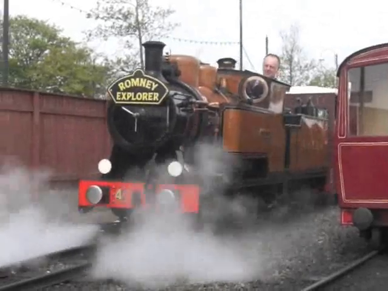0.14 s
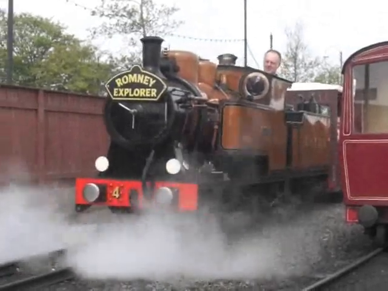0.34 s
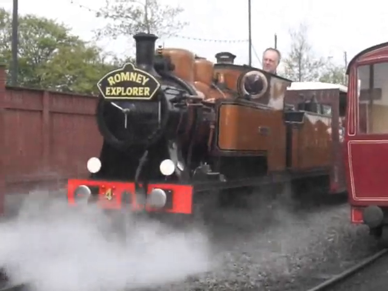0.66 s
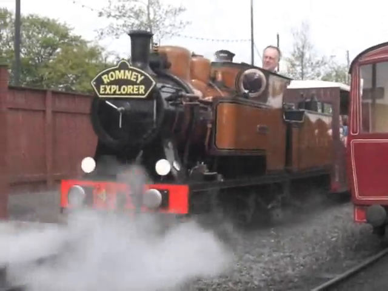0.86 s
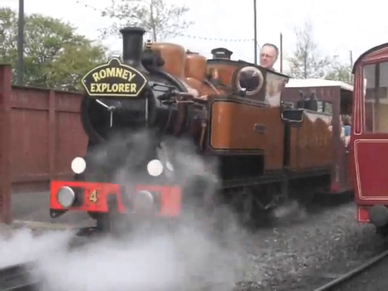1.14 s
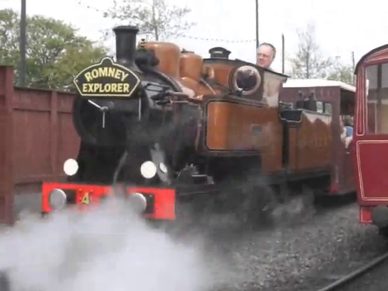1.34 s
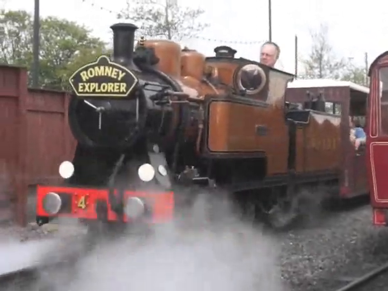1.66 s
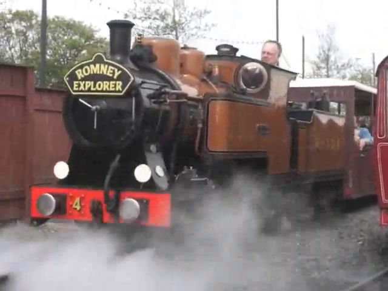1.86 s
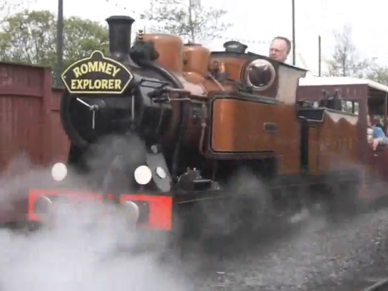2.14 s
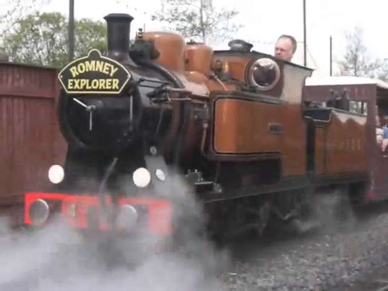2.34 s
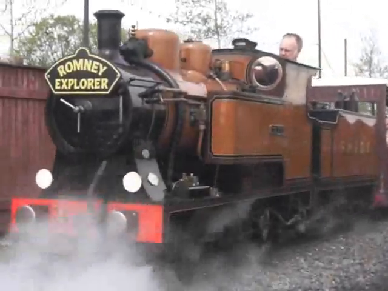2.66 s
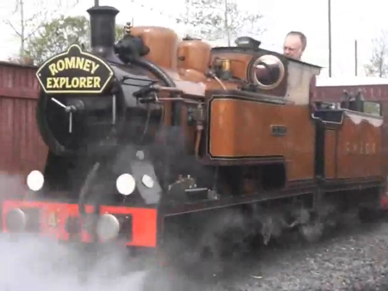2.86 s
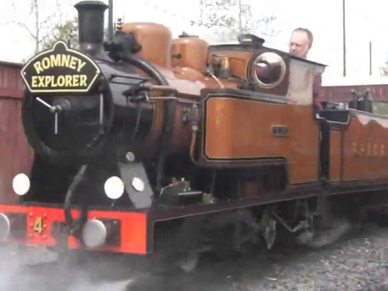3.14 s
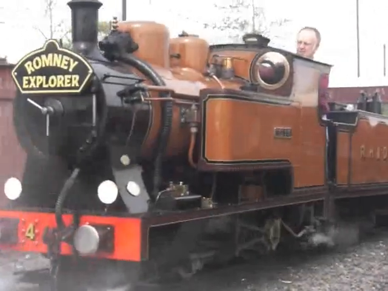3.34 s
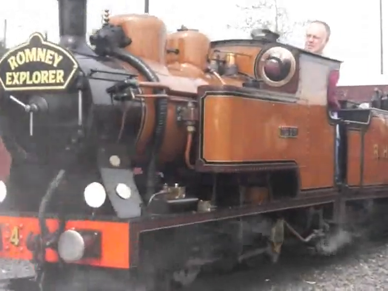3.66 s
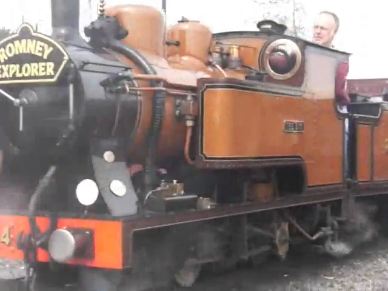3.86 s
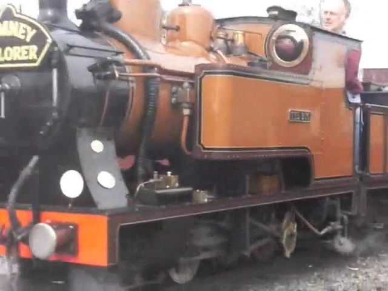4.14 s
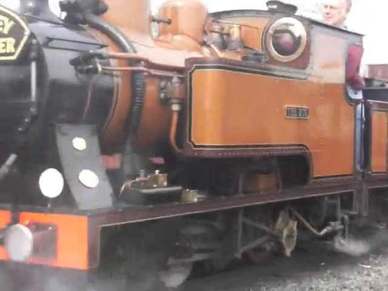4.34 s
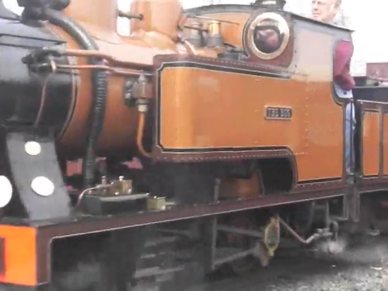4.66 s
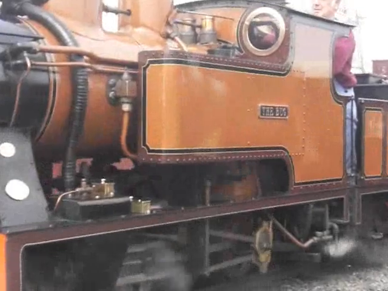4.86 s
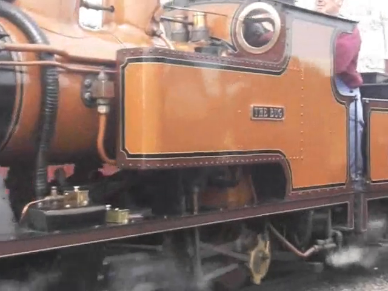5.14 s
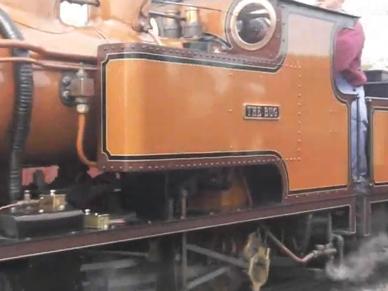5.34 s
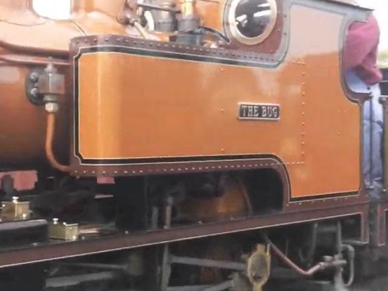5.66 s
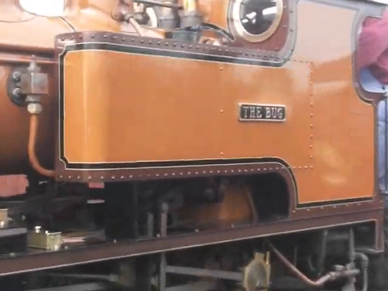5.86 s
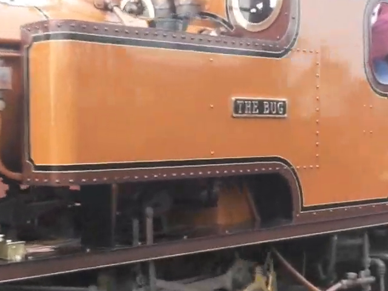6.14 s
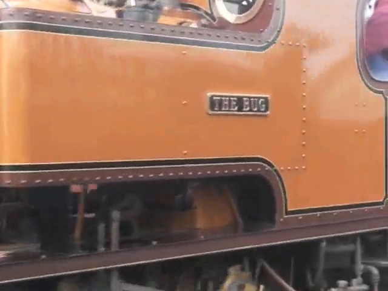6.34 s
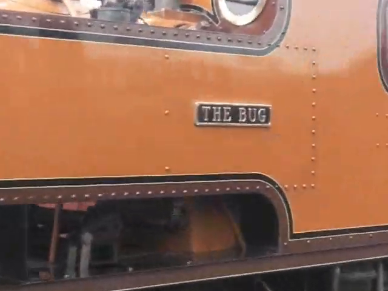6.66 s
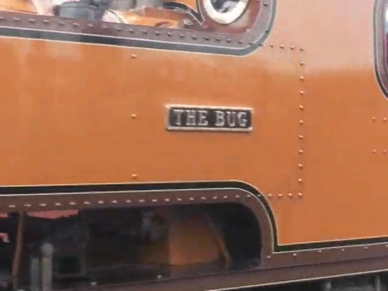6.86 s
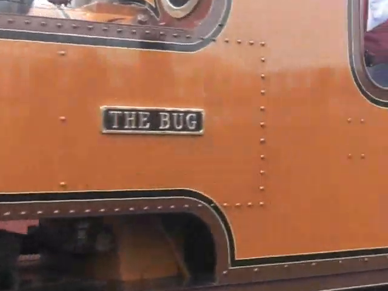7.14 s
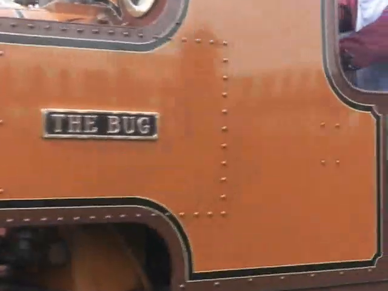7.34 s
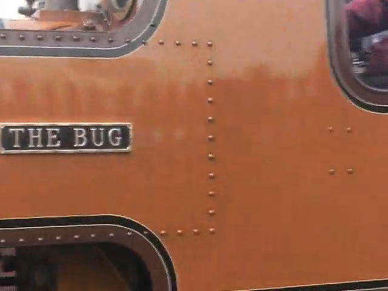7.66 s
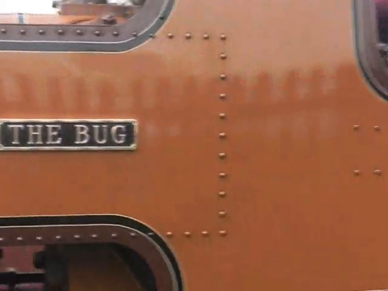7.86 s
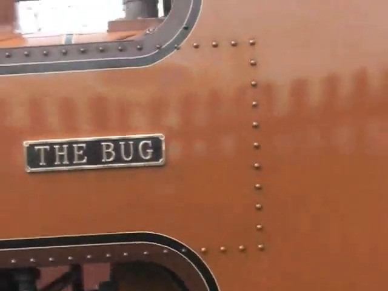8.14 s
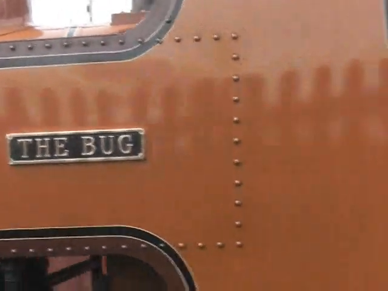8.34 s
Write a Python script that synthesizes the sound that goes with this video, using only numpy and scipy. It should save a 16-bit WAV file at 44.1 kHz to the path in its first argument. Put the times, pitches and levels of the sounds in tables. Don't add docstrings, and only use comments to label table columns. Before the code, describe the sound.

Outdoors beside a fenced track, a small steam engine approaches slowly. Bright, ragged jets of steam hiss and surge, some with a lower roar and a brief slap off the fence. Soft hollow chimney puffs begin after a few seconds; the big jets then die away, leaving regular hissing strokes and chuffs that strengthen as the engine comes very near the microphone. Low rolling rumble and faint motor hum lie underneath.

```python
import sys
import numpy as np
from scipy import signal
from scipy.fft import rfft, irfft
from scipy.io import wavfile
from scipy.ndimage import uniform_filter1d

SR = 44100
rng = np.random.default_rng(int(sys.argv[2]) if len(sys.argv) > 2 else 0)


def gain_from_decibels(decibels):
    exponent = np.asarray(decibels, float) / 20
    return 10 ** exponent


def inscribe(sig):
    pcm = np.round(np.clip(np.atleast_2d(sig).T, -1, 1) * 32767)
    wavfile.write(sys.argv[1], SR, pcm.astype(np.int16))


N = 375275
HOP = 128
TIMES = np.arange(N // HOP + 5) * HOP / SR

# (start [s], length [s], jet level [dB], fizz re jet [dB], change over the blast [dB])
STROKES = [
    (5.35, 0.24, -25, 1.5, 0),
    (5.633, 0.12, -21, 2, -2),
    (5.86, 0.14, -22.5, -9, 7),
    (6.04, 0.2, -22.5, 0.5, -3),
    (6.443, 0.23, -22, -1.5, -1),
    (6.89, 0.24, -20, -3.5, 2.5),
    (7.377, 0.22, -18.5, -2.5, -2.5),
    (7.835, 0.25, -18, -4, -3),
    (8.234, 0.2, -16.5, -5.5, -3.5),
]
# (time [s], nearness of the ear to the jet axis [0-1], treble loss in vapour [dB])
AIM = [(0, 0, 5), (.3, 0, 5), (.55, 0.39, -3), (.9, 0, 2), (1.2, 0.45, 0), (1.6, 0.3, -3), (2.1, 0.6, 0),
       (2.5, 0.23, 0), (3.1, 0.35, 0.5), (3.45, 0.62, 7), (3.85, 0.84, 1), (4.35, .9, 1), (4.6, 0.6, 4),
       (5.2, 0.55, 2), (6.1, 0.63, -2.5), (6.5, 0.25, -1), (7.2, 0.23, 3), (8.51, .05, 2)]
STROKE_EDGES_S = (0.061, 0.096)


def evened(x):
    return x / np.sqrt(np.mean(abs(x) ** 2) + 1e-20)


def read(points, hz):
    f, value = np.transpose(points)
    return np.interp(np.log(hz + 1), np.log(f + 1), value)


def follow(rows, t):
    s, *columns = np.transpose(rows)
    return [np.interp(t, s, c) for c in columns]


def smooth(frames):
    return np.interp(np.arange(N) / SR, TIMES, frames)


def drift(per_s):
    rates = np.geomspace(per_s / 6, per_s, 20)
    turns = rates * TIMES[:, None] + rng.random(len(rates))
    return evened(np.sin(2 * np.pi * turns).sum(1))


def resonate(x, hz, width):
    turn = np.exp(2j * np.pi * np.cumsum(hz * np.ones(len(x))) / SR)
    r = np.exp(-np.pi * width / SR)
    return 2 * (turn * signal.lfilter([1 - r], [1, -r], x / turn)).real


def coloured(colour):
    gain = gain_from_decibels(read(colour, np.fft.rfftfreq(N, 1 / SR)))
    return evened(irfft(rfft(rng.standard_normal(N)) * gain, N))


def blast(start, length, edges, change_db):
    rise_s, fall_s = edges
    rise = np.clip(.5 + (TIMES - start) / rise_s / 2, 0, 1)
    fall = np.clip(.5 + (start + length - TIMES) / fall_s / 2, 0, 1)
    along = np.clip((TIMES - start) / length, 0, 1) - .5
    swell = np.sin(rise * np.pi / 2) * np.sin(fall * np.pi / 2) * gain_from_decibels(change_db * along)
    return swell ** 2, along


def hum(waver_hz=1.2, half_db=-6.0):
    # (time [s], frequency [Hz], level [dB])
    motor = [(0, 132.5, -49), (1.2, 132.5, -47), (1.6, 132, -52), (2.7, 130, -49), (3.4, 127.5, -51),
             (3.9, 127, -39), (4.3, 127, -44), (4.6, 126.5, -53), (5.5, 126, -48.5), (6.8, 125.5, -51),
             (8.51, 124, -50)]
    t = np.arange(N) / SR
    hz, db = follow(motor, t)
    turns = np.cumsum(hz + waver_hz * smooth(drift(per_s=5.3))) / SR
    swell = gain_from_decibels(db - 3.5 + 2.0 * smooth(drift(per_s=6.5)))
    return swell * (np.sin(2 * np.pi * turns) + gain_from_decibels(half_db) * np.sin(np.pi * turns))


def rumble(jolt_s=0.031):
    # (time [s], level [dB])
    rolling = [(0, -51), (1.4, -48.5), (1.7, -46), (3.25, -49.5), (3.6, -45), (4.1, -44), (4.36, -50),
               (4.7, -51), (5.15, -45), (5.6, -52), (6.25, -50), (7, -48), (8.51, -44)]
    # (frequency [Hz], density [dB per Hz])
    low_colour = [(8.8, -34), (15, -2.5), (48, 1), (200, -7.5), (260, -34), (440, -120)]
    # (time [s], level [dB])
    jolts = [(.14, -46), (2.7, -41), (3.48, -42), (3.95, -39), (4.19, -35), (4.59, -42), (4.74, -45),
             (5.87, -53), (6.14, -54), (6.89, -35), (7.54, -45), (7.73, -42), (7.95, -39), (8.2, -38),
             (8.37, -44)]
    power = gain_from_decibels(follow(rolling, TIMES)[0] + 1.6 * drift(per_s=9.2)) ** 2
    for s, db in jolts:
        power = power + gain_from_decibels(db) ** 2 * np.exp(-((TIMES - s) / jolt_s) ** 2)
    return coloured(low_colour) * smooth(np.sqrt(power)) * gain_from_decibels(-0.5)


def chimney(rise_s=.008, fall_s=.016, lead_s=.015, thump_s=.024, sing=.06):
    # (time [s], puff [dB], thump [dB], pipe note [Hz], side modes re main [dB])
    chuffs = [(3.12, -39, -52, 573, -6), (3.426, -36, -37, 559, -6), (3.73, -48, -41, 559, 0),
              (3.994, -37, -27, 545, 0), (4.276, -42, -40, 561, 0), (4.631, -33, -37, 553, 2),
              (4.865, -31.5, -48, 530, 0), (5.113, -43, -37, 570, 0), (5.419, -37, -46, 496, 2),
              (5.677, -34, -34, 536, 2), (5.905, -36, -32, 532, 2), (6.148, -35, -46, 539, -3),
              (6.395, -30.5, -54, 532, 3), (6.626, -34, -37, 548, -5), (6.851, -31.5, -28, 542, 4),
              (7.076, -39, -37, 530, 4), (7.313, -28, -34, 553, 15), (7.541, -29, -41, 566, 0),
              (7.739, -31, -40, 557, 4), (7.975, -26, -26, 538, -1.5), (8.184, -25, -43, 533, -2),
              (8.392, -25.5, -30, 535, 0)]
    # (multiple of the note [1], bandwidth [Hz], level [dB])
    modes = [
        (1.01, 55, 0),
        (.85, 55, -4),
        (1.2, 90, -6),
        (1.45, 180, -11),
        (1.95, 300, -15),
        (.6, 150, -12),
    ]
    out = np.zeros(N + SR)
    t = np.arange(-SR // 10, SR // 10) / SR
    for s, puff_db, thump_db, note_hz, breathy_db in chuffs:
        puff_air, push_air = rng.standard_normal((2, len(t)))
        gust = np.exp(-(abs(t) / np.where(t < 0, rise_s, fall_s)) ** 1.6)
        blow = (puff_air + sing * np.sin(2 * np.pi * note_hz * t)) * gust
        puff = np.zeros(len(t))
        for i, (k, width, db) in enumerate(modes):
            ring = resonate(resonate(blow, k * note_hz, width), k * note_hz, 2 * width)
            puff += (-1) ** i * gain_from_decibels(db + breathy_db * (i > 0)) * evened(ring)
        crest = np.argmax(uniform_filter1d(puff ** 2, size=500))
        puff = np.roll(puff, len(t) // 2 - crest)
        push = resonate(push_air, 50., 45.) * np.exp(-((t + lead_s) / thump_s) ** 2)
        at = round(s * SR) - SR // 10
        out[at:at + len(t)] += gain_from_decibels(puff_db + 6.5) * puff / abs(puff).max()
        out[at:at + len(t)] += gain_from_decibels(thump_db) * push / abs(push).max()
    return out[:N]


def roar():
    # (start [s], length [s], roar [dB], deep part re roar [dB], change over the blast [dB])
    cocks = [(1.07, 0.074, -36.5, -5, 9), (1.2, 0.25, -41.5, -17, -1), (1.5, 0.53, -32, -4, 2.5),
             (2.08, 0.22, -30.5, -6, 0), (2.35, 0.51, -31.5, -5.5, -2.5), (2.93, 0.13, -39.5, -5.5, -5),
             (3.5, 0.35, -51, 1, 17), (3.8, 0.15, -39.5, -7, 10), (4.02, 0.31, -41.5, -5.5, -3),
             (4.4, 0.33, -29.5, -6.5, 3.5), (4.78, 0.13, -39, -10, -6), (4.93, 0.33, -33, -6.5, 4.5)]
    # (frequency [Hz], density [dB per Hz])
    broad_colour = [(250, -40), (450, -7), (650, 0.5), (1000, 1), (1500, 3), (2200, 1), (3200, -3),
                    (5000, -27)]
    low_colour = [(35, -24), (90, -6), (250, 0), (400, 0), (600, -2), (900, -22)]
    cock_edges_s = (0.052, 0.059)
    floor_db, stroke_db, stroke_deep_db, gurgle_db = -43.5, -21.5, -9.5, 0.33
    deep_far_db, deep_near_db, nearing_s = -49.5, -42.5, (6.9, 7.4)
    broad = gain_from_decibels(floor_db) ** 2
    deep = gain_from_decibels(np.interp(TIMES, nearing_s, [deep_far_db, deep_near_db])) ** 2
    strokes = [(s, length, db + stroke_db, stroke_deep_db, change_db)
               for s, length, db, _, change_db in STROKES]
    for rows, edges in (cocks, cock_edges_s), (strokes, STROKE_EDGES_S):
        for start, length, db, deep_db, change_db in rows:
            power = blast(start, length, edges, change_db)[0] * gain_from_decibels(db) ** 2
            broad = broad + power
            deep = deep + power * gain_from_decibels(deep_db) ** 2
    gurgle = gain_from_decibels(gurgle_db * drift(per_s=8.5))
    broad_part = coloured(broad_colour) * smooth(np.sqrt(broad) * gurgle) * gain_from_decibels(3.0)
    deep_part = coloured(low_colour) * smooth(np.sqrt(deep) * gurgle) * gain_from_decibels(1.5)
    return broad_part + deep_part


def steam():
    # (start [s], length [s], jet level [dB], fizz re jet [dB], change over the blast [dB])
    blasts = [(-.05, .46, -20, -2, -3.5), (.09, 0.27, -21.5, -9, 6), (0.45, 0.092, -19, -8, 0),
              (0.58, 0.16, -18.5, -6.5, -3.5), (0.81, 0.21, -20, -4, 5), (1.051, 0.21, -15.5, -3, -1),
              (1.276, 0.17, -18.5, -3.5, -5), (1.471, 0.58, -15, -3.5, 2), (1.594, 0.15, -16, -6, -3),
              (2.077, .4, -15, -2.5, 2.5), (2.498, 0.42, -13.5, -5, -3), (2.948, 0.19, -17, -3, -7),
              (3.074, 0.28, -22.5, -2.5, 0), (3.462, 0.064, -20.5, 2.5, 4.5), (3.66, 0.21, -24, -11, 10),
              (3.9, .16, -18, -5, -5), (4.09, 0.086, -18.5, -4, 2), (4.248, 0.22, -17.5, 0, 6),
              (4.456, 0.34, -17, 1.5, 0), (4.56, 0.11, -18, 0, -4), (4.78, 0.15, -23, 5.5, 0),
              (4.92, 0.4, -16.5, 0.5, -1), (6.27, 0.14, -31, -1, -7)]
    # (skirt [dB], lower hiss [dB], core [dB], fizz [dB])
    leak_db = [-38, -32.5, -23.5, -28]
    # (skirt [dB], lower hiss [dB], core [dB], fizz [dB])
    axis_db = [9, 7.5, -1.5, 0]
    blast_edges_s = (0.058, 0.065)
    skirt_db, lower_db = -17, -10.5
    blast_brighten_db, stroke_brighten_db = -1.5, 8
    fizz_steepness = 1.35
    steepness = np.array([[1], [1], [1], [fizz_steepness]])
    power = gain_from_decibels(leak_db)[:, None] ** 2 * np.ones(len(TIMES))
    kinds = (blasts, blast_edges_s, blast_brighten_db), (STROKES, STROKE_EDGES_S, stroke_brighten_db)
    for rows, edges, brighten_db in kinds:
        for start, length, db, fizz_db, change_db in rows:
            shape, along = blast(start, length, edges, change_db)
            zones_db = np.array([skirt_db, lower_db, 0, fizz_db])[:, None]
            zones_db = zones_db + np.outer([0.5, 0.54, 0.26, 1], brighten_db * along)
            power = power + shape ** steepness * gain_from_decibels(db + zones_db) ** 2
    return 10 * np.log10(power) + np.outer(axis_db, follow(AIM, TIMES)[0])


def bounced(hz, wander=0.009, veil_db=2.5):
    # (facing the jet at [s], for [s], extra path [ms], path growth [ms per s],
    # share of the direct jet [1])
    bounces = [(4, 3.5, .18, .004, .11), (0, .35, .21, .1, .14), (6.5, 2.2, .33, .002, .075),
               (4.8, .8, .58, -.02, .08), (8, .7, .46, -.04, .06), (5.1, .2, .19, -.02, .1),
               (6.12, .2, .162, -.03, .1), (7.08, .15, .19, -.05, .13), (8.33, .12, .15, -.1, .1),
               (.45, .15, 1.2, -.1, .16), (.35, .3, 1.47, .1, .15), (.95, .3, 1.4, -.15, .17),
               (.55, .2, 1.6, -.3, .14), (1.6, .25, 1.62, -.1, .16), (2.1, .2, 1.36, .1, .18),
               (2.4, .2, 1.6, .2, .16), (2.8, .22, 1.52, .2, .18), (2.8, .2, 1.66, .2, .13),
               (3.15, .2, 1.78, .2, .2), (3.25, .2, 2.22, .1, .14), (3.5, .15, 1.72, .1, .14),
               (1.7, .4, 1.95, .1, .1), (3.95, .25, 2.26, .1, .18), (3.9, .3, 1.98, .2, .14)]
    comb = np.ones((len(hz), len(TIMES)), complex)
    power = 1
    for s, span, path_ms, growth, facing in bounces:
        ms = path_ms + growth * (TIMES - s)
        share = facing * np.exp(-((TIMES - s) / span) ** 2)
        share = share * gain_from_decibels(3.5 + veil_db * drift(per_s=6.0))
        near = share > .003
        ms = ms * (1 + wander * drift(per_s=3.0))
        comb[:, near] += share[near] * np.exp(-2j * np.pi * hz[:, None] * ms[near] / 1000)
        power = power + share ** 2
    return comb / np.sqrt(power)


def jets(patchy_db=1.0, flutter_db=0.53):
    # (frequency [Hz], density [dB per Hz])
    hiss_colour = [(1450, -35), (1800, -20), (2050, -16), (3130, -8), (4290, -2), (6770, -2.5), (8360, 0),
                   (12300, 0), (14600, -2.5), (15400, -8.5)]
    # (from [Hz], to [Hz])
    zones_hz = [
        (2000, 3200),
        (3200, 5500),
        (5500, 10000),
        (10000, 15400),
    ]
    veil_hz = (10500, 15400)
    hz = np.fft.rfftfreq(512, 1 / SR)
    a, b, patches = rng.standard_normal((len(TIMES), len(hz), 3)).T
    patches = uniform_filter1d(uniform_filter1d(patches, size=10, axis=0), size=24, axis=1)
    patches = evened(patches)
    billows = uniform_filter1d(uniform_filter1d(patches, size=22, axis=0), size=60, axis=1)
    billows = evened(billows)
    colour = gain_from_decibels(read(hiss_colour, hz))
    shares_db = [10 * np.log10(np.sum(colour[(hz >= lo) & (hz < hi)] ** 2)) for lo, hi in zones_hz]
    levels_db = steam() - np.array(shares_db)[:, None]
    centres_hz = np.sqrt(np.prod(zones_hz, axis=1))
    place = np.interp(np.log(hz + 1), np.log(centres_hz), np.arange(4))
    weights = np.maximum(1 - abs(place[:, None] - np.arange(4)), 0)
    veiled_db = np.outer(np.interp(hz, veil_hz, [0, 1]), follow(AIM, TIMES)[1])
    field_db = weights @ levels_db - veiled_db
    field_db = field_db + patchy_db * patches + 0.3 * billows + flutter_db * drift(per_s=35.)
    z = (a + 1j * b) * colour[:, None] * gain_from_decibels(field_db) * bounced(hz)
    return gain_from_decibels(1.0) * signal.istft(z, nperseg=512, noverlap=512 - HOP)[1][:N]


def fenced(hiss):
    # (facing the jet at [s], for [s], extra path [ms], share of the direct jet [1])
    fence = [
        (.15, .2, 4.74, .26),
        (.15, .2, 4.52, .2),
        (.97, .2, 5.08, .34),
        (1.65, .25, 5.16, .15),
    ]
    t = np.arange(N) / SR
    slap, power = np.zeros(N), 1
    for s, span, ms, facing in fence:
        share = facing * np.exp(-((t - s) / span) ** 2)
        slap += share * np.roll(hiss, round(ms * SR / 1000))
        power = power + share ** 2
    return (hiss + slap) / np.sqrt(power)


def swapped(mid, side_db=-3.5):
    swaps_per_s, swap_hz, swap_width_hz = 6.5, (4000, 14200), 1450
    side = np.zeros(N)
    hz = np.fft.rfftfreq(2048, 1 / SR)
    fade = signal.windows.kaiser_bessel_derived(2048, 4 * np.pi)
    for at in range(770, N - 2048, 1024):
        chance, place = rng.random(2)
        if chance < swaps_per_s * 1024 / SR:
            lo = int(np.interp(place, [0, 1], swap_hz))
            band = rfft(mid[at:at + 2048]) * ((hz > lo) & (hz < lo + swap_width_hz))
            scrambled = band * np.exp(2j * np.pi * rng.random(len(hz)))
            side[at:at + 2048] += fade ** 2 * irfft(scrambled)
    return gain_from_decibels(side_db) * side


def scene():
    mono = hum() + rumble() + chimney() + roar() + fenced(jets())
    return np.tile(mono, (2, 1))


def top_cut(x):
    return signal.sosfilt(signal.butter(12, 15590, fs=SR, output="sos"), x)


def record(dry):
    notch_hz, notch_width_hz = 7633, 65
    notched = signal.lfilter(*signal.iirnotch(notch_hz, notch_hz / notch_width_hz, SR), dry[0])
    mid = 0.89 * notched + 0.14 * dry[0]
    mid = mid / (1 + abs(mid / .95) ** 4) ** .25
    low_pass = signal.firwin(2047, 15430, window=("kaiser", 9), fs=SR)
    mid = signal.oaconvolve(mid, low_pass, "same")
    return top_cut(mid + swapped(mid) * np.array([[1], [-1]]))


dry = scene()
out = record(dry)
inscribe(out)
```